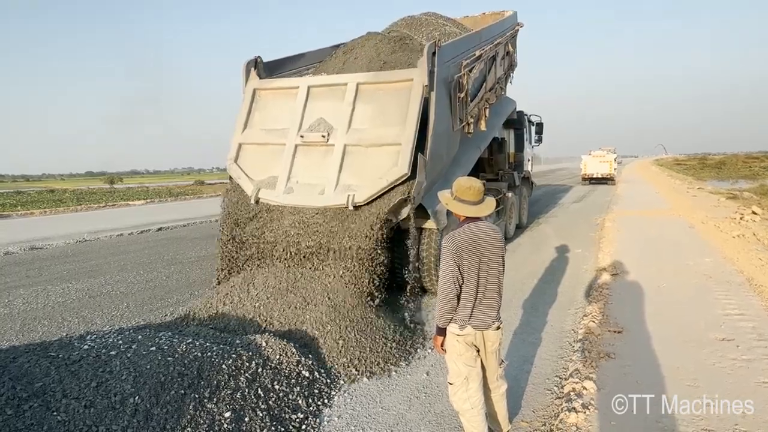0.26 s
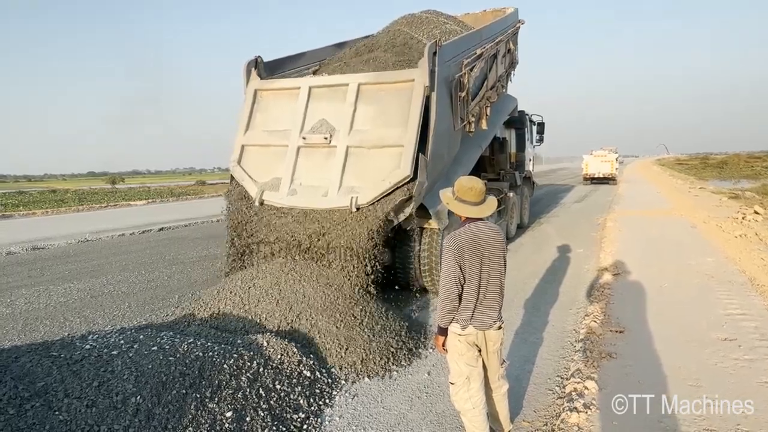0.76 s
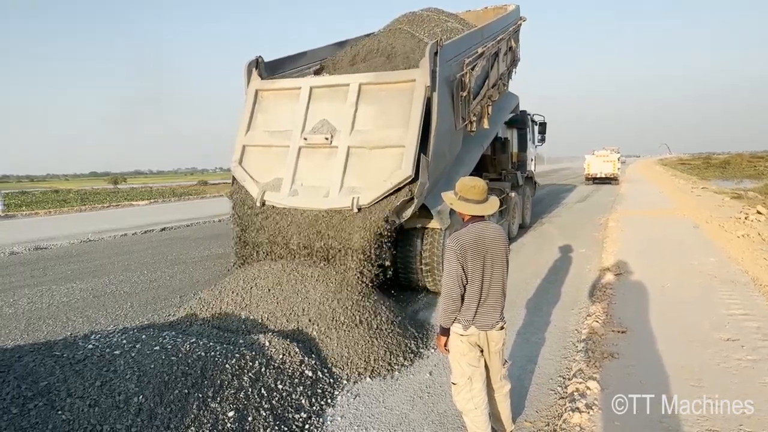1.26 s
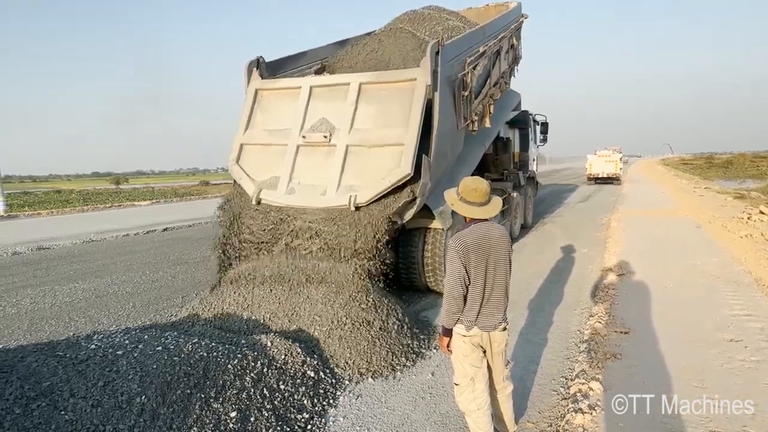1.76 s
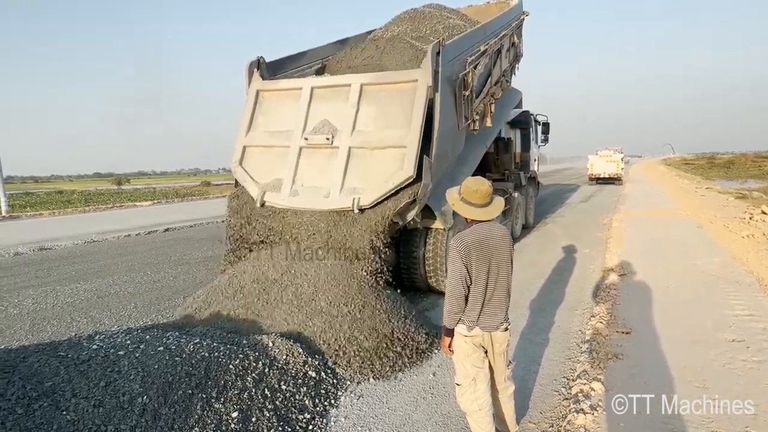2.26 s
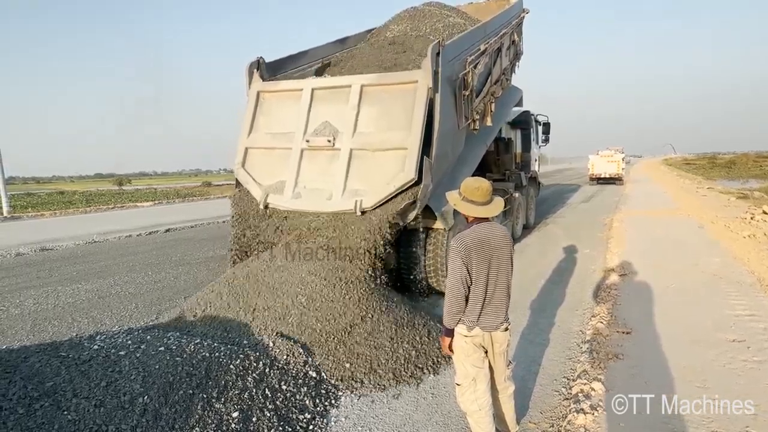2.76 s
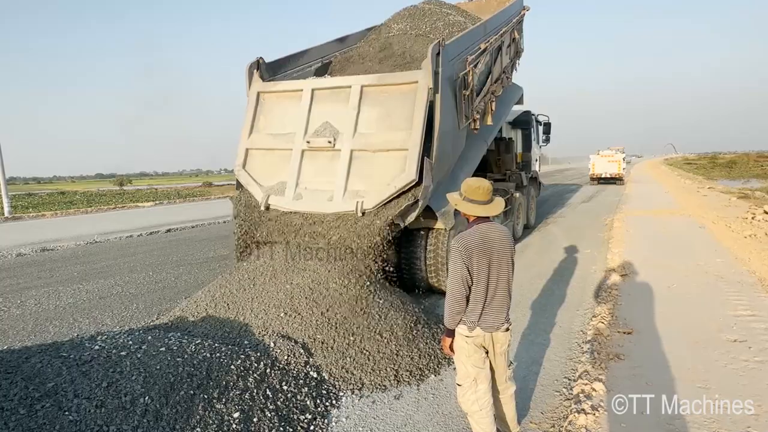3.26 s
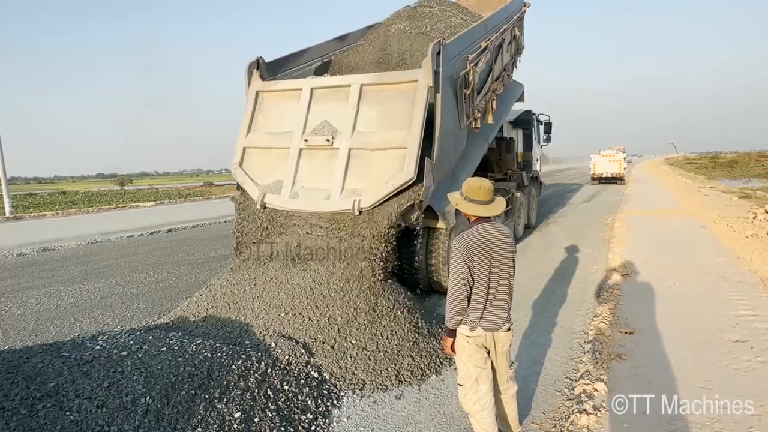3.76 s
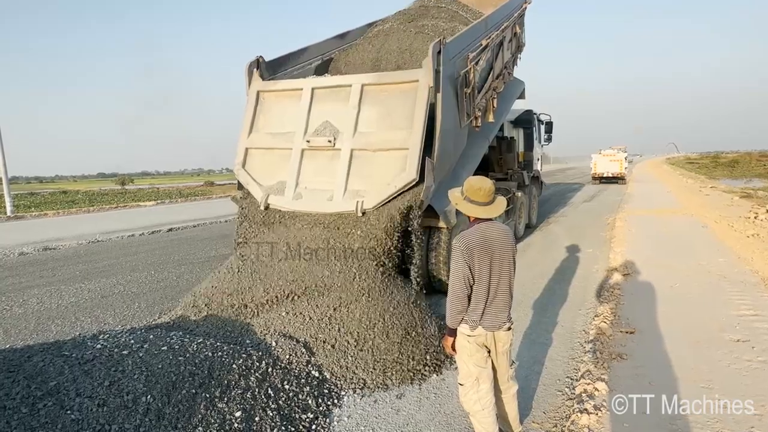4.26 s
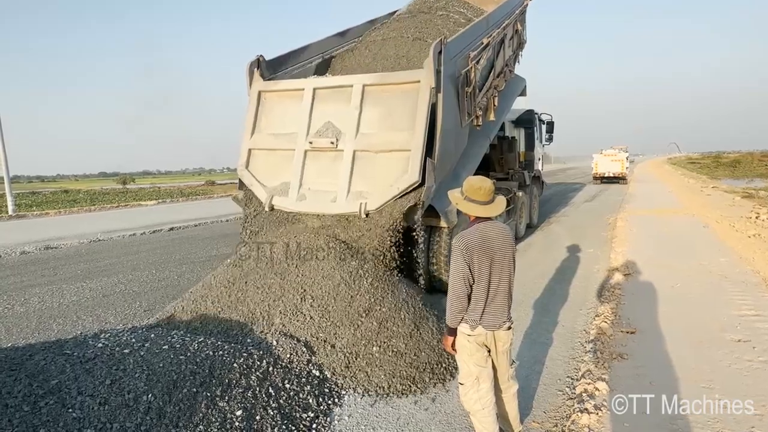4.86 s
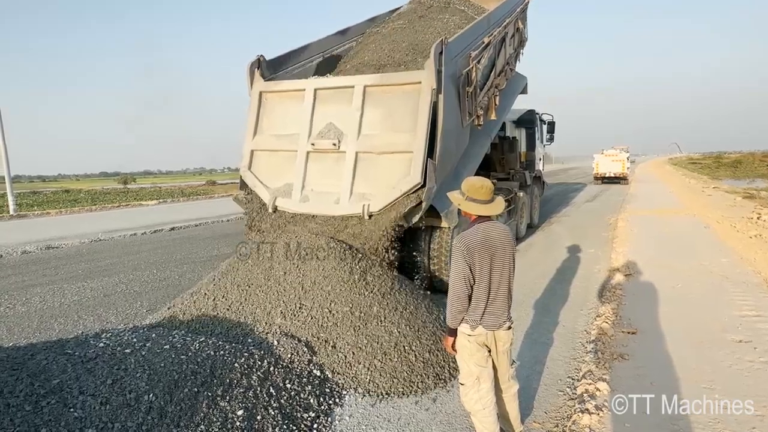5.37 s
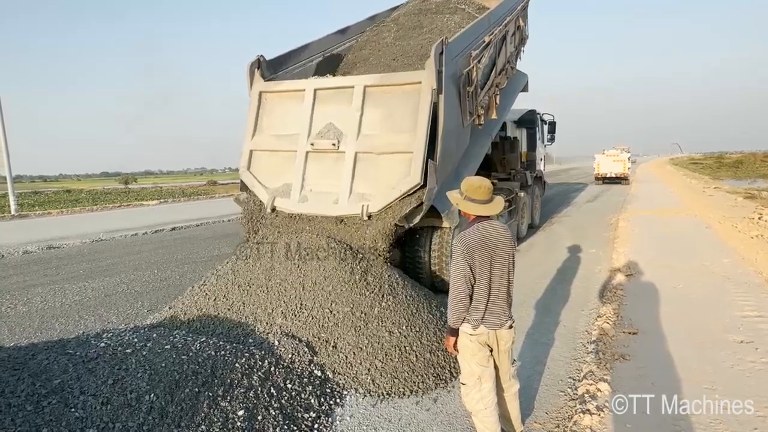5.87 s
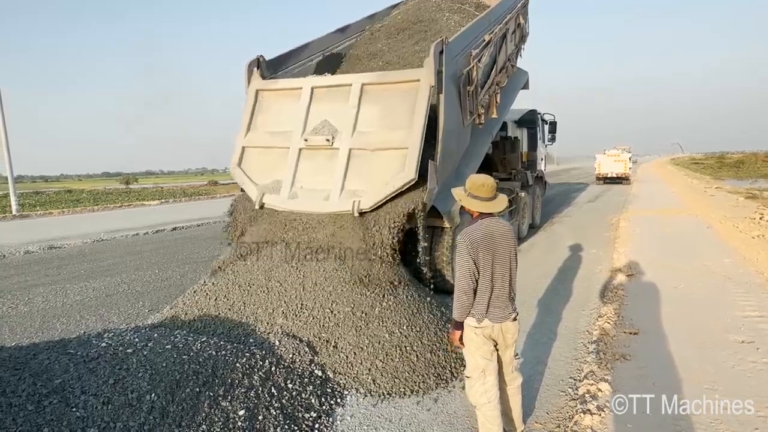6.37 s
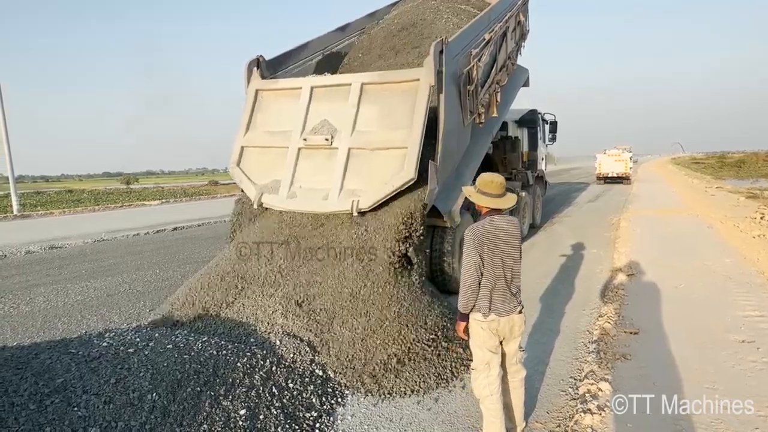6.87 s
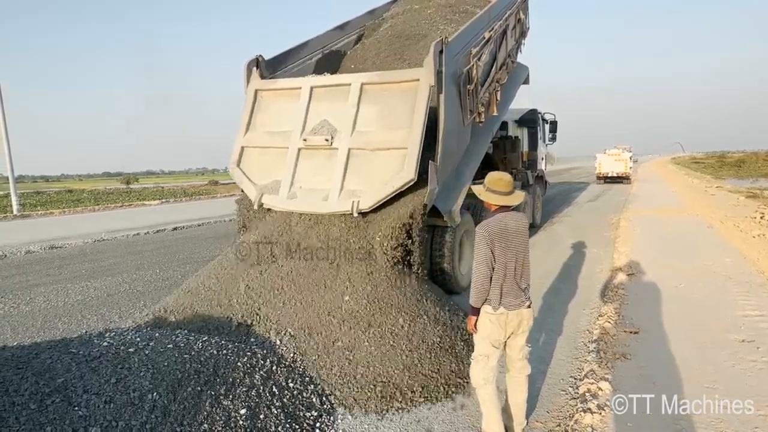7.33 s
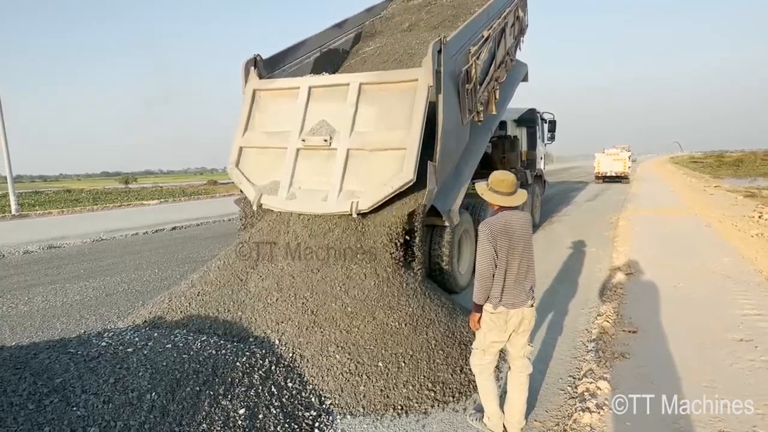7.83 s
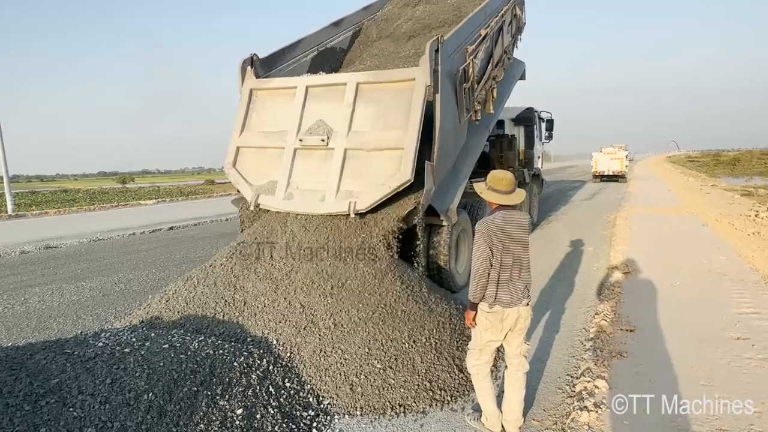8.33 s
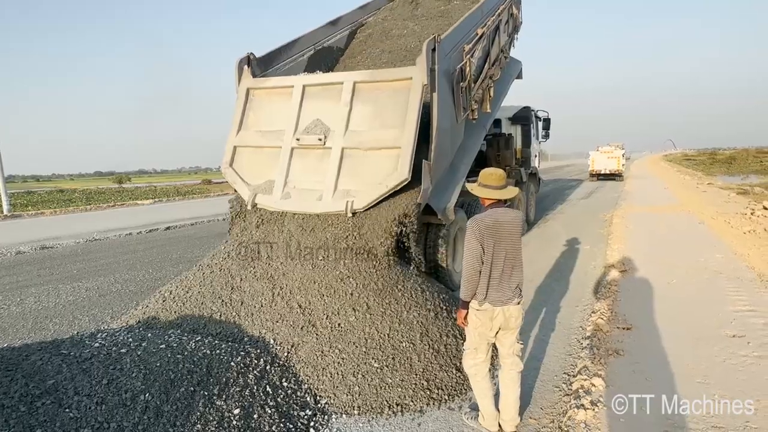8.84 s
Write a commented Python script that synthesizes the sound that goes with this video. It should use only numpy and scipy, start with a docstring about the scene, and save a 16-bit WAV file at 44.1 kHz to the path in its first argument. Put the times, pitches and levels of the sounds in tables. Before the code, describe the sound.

Outdoors at a roadworks site, a compact stereo microphone sits close behind a tipping diesel truck. From the start a low, loaded engine drone and broad roar run steadily, wavering slightly in pitch, with a tonal pump whine above. Fine gravel hisses brightly, strongest at the opening. Around 1.2-1.4 s a dense burst of coarse stones clatters through ringing steel; from about 0.3 to 2.8 s a more distant engine climbs in pitch and fades. Further surges come near 3.2, 4.1 and 4.6 s, then a busy run of clacks from 5.5 to 6.4 s. The hiss thins near 6 s and swells again around 6.8 s with few knocks. At about 7.8 s the engine quickly drops, wobbles briefly and settles into a slower, softer idle by 8.7 s; the pump whine sinks and vanishes near 8.1 s. A last scatter of stones rattles from 8.6 s to the end, around 9 s.

```python
"""Tipping site: a six-cylinder diesel tipper holds its bed up with a whining pump while gravel slides out.
Exhaust lines, pump and whine are sines tied to the crankshaft; the engine roar is coloured noise.
Fine stones hiss, coarse ones slump in surges through the ringing steel, single stones clack at two pitches.
Near the end the engine drops to idle; early on, a second machine farther off speeds up and fades.
Two microphone ports on a small camera hear it all as a sum and a difference."""
import sys
import numpy as np
from scipy import signal
from scipy.fft import rfft, irfft
from scipy.io import wavfile
from scipy.ndimage import uniform_filter1d

SR = 44100
rng = np.random.default_rng(int(sys.argv[2]) if len(sys.argv) > 2 else 0)


def inscribe(sig):
    """Save sig as 16-bit PCM at rate SR to the path in sys.argv[1].

    A 1-D sig is mono; a 2-D sig holds one channel per row.
    Samples are clipped to [-1, 1] before scaling.
    """
    pcm = np.round(np.clip(np.atleast_2d(sig).T, -1, 1) * 32767)
    wavfile.write(sys.argv[1], SR, pcm.astype(np.int16))


N = 401310
T, HZ = np.arange(N) / SR, np.fft.rfftfreq(N, 1 / SR)

# truck engine, hunting slowly under load, then dropping to idle: t/s, firing rate f/Hz, relative effort/dB
ENGINE = [(0, 41.8, 5.5), (.3, 41.7, 2.5), (.7, 42.43, 2), (1, 43.27, 1), (1.4, 43.85, 0.5),
          (2, 44.05, -0.5), (3.5, 44.22, 0.5), (3.8, 42, 1.5), (4.2, 41.7, 2), (4.6, 42.2, 1),
          (5.05, 43.55, -.5), (5.4, 43.82, -0.5), (5.95, 43.9, -1), (6.3, 42.77, 0), (7, 42.66, 0),
          (7.75, 42.28, 1), (7.81, 39.3, -2), (7.87, 36.46, -5), (7.96, 33.63, -8), (8.06, 29.54, -0.5),
          (8.2, 31.04, 1.5), (8.33, 33.56, -7), (8.45, 29.47, -2.5), (8.62, 26.92, -15), (8.67, 26.9, -4.5),
          (8.8, 26.78, -2), (9.1, 27.2, -3)]
# firing multiples 1 to 4: relative strength/dB, waver/dB
FIRING = [(-1.4, 0), (0.67, 1), (-8.5, -4), (-8, 3)]
# exhaust pipe, colouring the firing multiples as they move: f/Hz, level/dB
PIPE = [(27, -64), (31, -56), (38, -53), (41.5, -31.5), (44.3, -23), (54, -29.5), (63, -25), (75, -25),
        (85, -25.5), (98, -22.5), (108, -20.5), (120, -33.5), (130, -24.5), (165, -42), (177, -30)]
# weak lines between, from unequal cylinders: multiple of the crankshaft turn, relative level/dB
UNEVEN = [(4, -36), (4.5, -42), (5, -34), (5.5, -53), (6.5, -38.5), (7, -48), (7.5, -32.5), (8, -32.5),
          (10, -48), (13, -44), (13.5, -47), (15, -47), (16, -44.5), (19, -46), (21, -50.5), (24, -46),
          (27, -50), (30, -65)]
# gear pump: t/s, level/dB of its multiples 1, 2 and 3
PUMP = [(0, -38, -43, -60), (.3, -36, -28.5, -51), (.7, -30, -39, -56), (1.3, -23.5, -38, -52),
        (1.9, -21, -36.5, -63), (2.3, -21.5, -41.5, -56), (2.9, -20.5, -38, -48), (3.4, -19, -33.5, -45),
        (3.6, -25.5, -43, -57), (3.9, -25.5, -32.5, -58), (4.5, -22.5, -34.5, -53),
        (4.9, -26.5, -38.5, -42), (5.05, -28.5, -62, -54), (5.45, -20, -66, -65), (6, -20.5, -37, -51),
        (6.12, -26, -50, -54), (6.4, -20.5, -58, -43), (7.1, -26, -75, -47), (7.68, -24, -46, -43),
        (7.76, -28, -35, -45), (7.83, -24.5, -49, -54), (7.92, -41, -37, -31), (7.99, -50, -39, -49),
        (8.1, -56, -52, -60)]
# faint upper lines that come and go: t/s, level/dB of pump multiple 4, of multiple 5, of a gear whine
UPPER_LINES = [(.3, -64, -62, -60), (.7, -38.5, -62, -62), (1.15, -46, -56, -46), (1.5, -64, -51, -42),
               (2.2, -58, -44, -45.5), (3.2, -62, -46, -54), (3.6, -54, -56, -59), (4.5, -57, -62, -60),
               (5, -40, -62, -44.5), (5.4, -60, -62, -48), (6.7, -62, -62, -48), (7.2, -62, -62, -66)]
# engine body roar: f/Hz, relative level per Hz/dB
ROAR_COLOUR = [(30, -44), (45, -10.5), (100, -1.5), (180, -7.5), (260, -12), (350, -9), (400, -14),
               (520, -23.5), (640, -13), (800, -13.5), (980, -16.5), (1070, -26.5), (1350, -20),
               (1620, -30.5), (2200, -38.5), (3000, -43)]
# fine gravel sliding in fresh flows: t/s, level/dB
SLIDE = [(0.0, -28), (0.56, -32.5), (1.72, -34.5), (1.82, -32), (3.4, -38.5), (4.2, -35), (5.96, -46),
         (6.59, -36), (6.79, -31.5), (8.46, -44.5), (9.1, -39)]
# colour of the fine gravel: f/Hz, relative level per Hz/dB
SLIDE_COLOUR = [(600, 1), (1500, -4), (2200, -6.5), (3200, -7), (4500, -4.5), (6300, 0.5), (8500, 3),
                (11000, -9), (13500, -1), (15800, -1.5)]
# colour of the coarse stones: f/Hz, relative level per Hz/dB
SLUMP_COLOUR = [(320, -60), (550, -5.5), (652, 1.5), (1060, -8.5), (1370, 3.5), (1700, -19), (2020, -3),
                (2870, -11.5), (3270, -8.5), (4540, -15.5), (5860, -17.5), (10000, -26), (13000, -66),
                (22000, -120)]
# surges of coarse stones: start t/s, relative peak level/dB, rise/s, fall/(dB/s)
SURGES = [(1.16, -27, 0.023, 5.8), (1.21, -21.5, 0.017, 93), (1.32, -23.5, 0.016, 85),
          (1.4, -34, .025, 180), (1.95, -34, 0.029, 210), (3.16, -26, 0.043, 20), (4.02, -27, 0.027, 210),
          (4.1, -26.5, 0.025, 490), (4.17, -33, 0.038, 9), (4.555, -31, 0.02, 40), (5.47, -32, 0.054, 125),
          (5.63, -30, 0.038, 1.7), (5.83, -30, 0.019, 3.2), (7.7, -37, 0.021, 340),
          (8.56, -34.5, 0.097, 32.4), (8.73, -30.5, 0.028, 5.6), (8.88, -32.5, 0.12, 10.2)]
# modes of the steel tailgate and bed that the stones strike: f/Hz, width/Hz, relative level/dB
STEEL = [(780, 200, 2), (1390, 270, 1.5), (1875, 190, -7.5), (2346, 165, -2.5), (2604, 126, -5.5),
         (3275, 140, -3.5), (4080, 650, -12), (5700, 300, -7), (6150, 270, -7.5), (7080, 360, -7.5),
         (7810, 150, -5)]
# single stones: t/s, relative strength/dB, first ring f/Hz, second ring f/Hz, second against first/dB
CLACKS = [(0.031, -30, 1340, 5480, -9), (1.171, -31, 2420, 1460, -5), (1.184, -28, 2590, 4100, -3),
          (1.199, -30, 1910, 2400, -2), (1.22, -25.5, 1960, 5940, -6), (1.234, -29, 2440, 3630, -7),
          (1.254, -31, 3900, 1292, 5), (1.331, -26.5, 3330, 1950, 1.5), (1.385, -27, 1442, 5770, -7),
          (1.414, -26, 2070, 3140, -4), (1.681, -34, 2660, 2020, 1), (1.972, -31, 3603, 4600, -2),
          (2.5, -32, 2100, 5680, -5), (3.192, -31, 2497, 4290, -9), (3.239, -30.5, 2080, 1296, -3),
          (3.272, -25.5, 2070, 4050, -7), (3.937, -34, 2150, 2730, -1), (4.041, -30, 1310, 2340, -4),
          (4.058, -34, 3370, 2650, -4), (4.108, -35, 3620, 1390, 3), (4.119, -33.5, 1327, 1780, -1),
          (4.341, -34, 3350, 5810, -7), (4.424, -34, 2312, 3300, -4), (4.458, -33.5, 3330, 5270, -5),
          (4.563, -32, 1890, 1260, -3), (4.61, -39, 1990, 2600, -1), (4.65, -41, 3180, 2300, -1),
          (5.038, -32, 2340, 3680, -4), (5.285, -33, 3210, 5546, 4), (5.465, -33.5, 5440, 5940, -1),
          (5.529, -32.5, 2726, 5850, 1), (5.581, -26, 2700, 3360, -6), (5.655, -33, 2660, 2030, -14),
          (5.715, -34, 6850, 6250, 5), (5.75, -30, 1315, 3470, -8), (5.845, -23.5, 2020, 3190, -4),
          (5.868, -32, 2580, 4750, -3), (5.895, -34, 5440, 3523, -7), (5.919, -29, 2330, 6480, -5),
          (6.003, -28, 1320, 2050, -5), (6.023, -30.5, 7000, 2010, 3), (6.103, -30, 1380, 2100, -4),
          (6.153, -31.5, 4550, 6170, 1), (6.279, -38, 4620, 6180, 2), (6.326, -36, 6200, 6830, -3),
          (6.395, -31, 6280, 3180, 2), (7.717, -37, 3019, 1740, -2), (7.73, -37, 3090, 2540, 0),
          (7.739, -36, 2390, 1400, 1), (8.135, -34, 6000, 7010, 2), (8.287, -39, 3290, 6130, 3),
          (8.619, -38, 5600, 4660, -2), (8.65, -31, 6170, 4490, -5), (8.689, -36, 4300, 3400, 1),
          (8.734, -33, 2580, 3260, -4), (8.764, -32, 2010, 2670, -2), (8.808, -27.5, 1370, 2566, -11),
          (8.825, -33.5, 4410, 3400, 1), (8.862, -38, 1360, 3240, -11), (8.926, -31.5, 1353, 1935, -7),
          (8.96, -36, 1290, 3400, -5), (8.977, -34, 3340, 1447, 5), (9.024, -35, 1290, 5620, -6),
          (9.045, -30, 1358, 2407, -4), (9.075, -32, 3430, 5660, -1), (9.089, -35, 6040, 3760, -4)]
# second machine, farther off: t/s, firing rate f/Hz, level/dB
FAR_MACHINE = [(.3, 49.5, -46), (.7, 52.9, -32), (1.1, 65.7, -31), (1.5, 79.05, -33), (2.301, 76.87, -33),
               (2.8, 85.84, -33)]
# sum of the two ports: f/Hz, level/dB
PORT_SUM = [(300, -2), (1500, -2), (4500, -0.5), (5500, -1.5), (9000, -6.5), (10200, -0.5), (10600, -23.5),
            (11600, -38), (12000, -3.5), (13000, -1)]
# difference of the ports, which agree near 14.5 kHz: f/Hz, level/dB
PORT_DIFFERENCE = [(60, -16), (300, -16), (750, -11), (1700, -3.5), (2200, -5), (4500, 1), (9000, -7),
                   (11000, 5), (13000, -2), (13700, -7), (14000, -43), (15200, -48), (15500, -17)]
# share of the difference tied to the sum: f/Hz, in step (left louder), a quarter turn (left earlier)
PORT_TIE = [(60, 0.14, 0.086), (300, 0.33, -0.2), (800, 0.56, -0.46), (1700, 0.51, .1), (2200, 0.49, .45),
            (3380, 0.67, 0.26), (4500, 0.058, 0.36), (5470, -0.086, -.3), (6500, .2, .1), (8500, 0.01, -.1),
            (9500, 0, -.5), (10500, -0.053, -.4), (12500, 0, .65)]

FIRINGS_PER_TURN, PUMP_PULSES_PER_TURN, WHINE_PULSES_PER_TURN = 3, 10.917, 80
IDLE_FROM_S = 8.66
# roar level at the working firing rate, and its change per Hz of rate
WORKING_HZ, ROAR_DB, ROAR_DB_PER_HZ, ROAR_SMOOTH_S, ROAR_LAG_S = 41.66, -28, 0.56, 1, 0.064
# the rumble within the roar
RUMBLE_DB, RUMBLE_DB_PER_HZ, RUMBLE_SWELL_DB = -1.55, -0.1, 1.17
# coarse flow before its mix: a trickle that thins as the bed empties; a surge runs out after its time
TRICKLE_DB, THINS_DB_PER_S, SURGE_LASTS_S = -30.5, 0.73, 0.73
# levels against a stone's strength; its rings fall 60 dB in a set number of cycles
CLACK_RISE_S, RING_DB, RING_CYCLES, RATTLE_DB, RATTLE_T60_S = 0.0024, 4.5, 150, 6.5, 0.056
# the crack has this level for a stone at CRACK_PITCH_HZ
CRACK_DB, CRACK_T60_S, CRACK_PITCH_HZ = 8, 0.035, 3000
LOW_CUT_HZ, EDGE_HZ = 36.6, 15850


def engine_lines(firing_hz, effort_db, turns):
    """Exhaust pulses: firing multiples coloured by the pipe, and weaker lines from unequal cylinders."""
    out, levels_db = 0, []
    for multiple, (strength_db, _) in enumerate(FIRING, 1):
        pipe_db = np.interp(multiple * firing_hz, *np.transpose(PIPE))
        levels_db.append(effort_db + strength_db + pipe_db)
    for multiple, (db, (_, waver_db)) in enumerate(zip(levels_db, FIRING), 1):
        out = out + tone(FIRINGS_PER_TURN * multiple * turns, db, waver_db)
    # the weak lines follow the second firing multiple, averaged over half a second
    load_db = uniform_filter1d(levels_db[1], SR // 2) + 21.0
    return out + sum(tone(k * turns, db + load_db, waver_db=0.5) for k, db in UNEVEN)


def pump_lines(turns):
    """Gear pump and whine: tooth pulses geared to the crankshaft, fading out as the pump table ends."""
    pumping = np.clip((PUMP[-1][0] - T) / 0.11, 0, 1)
    out = sum(tone(PUMP_PULSES_PER_TURN * k * turns, db, waver_db=0.4 * k)
              for k, db in enumerate(curves(PUMP), 1))
    pulses = (4 * PUMP_PULSES_PER_TURN, 5 * PUMP_PULSES_PER_TURN, WHINE_PULSES_PER_TURN)
    out += sum(tone(k * turns, db, waver_db=4.5) for k, db in zip(pulses, curves(UPPER_LINES)))
    return pumping * out


def idle_notes(turns):
    """Two faint crankshaft multiples that come up once the engine settles at idle."""
    settled = np.clip((T - IDLE_FROM_S) / 0.11, 0, 1)
    return settled * (tone(5 * turns, -49, waver_db=0.0) + tone(7 * turns, -43, waver_db=0.0))


def roar():
    """Noise ringing in engine bay and steel bed follows engine speed; its deep rumble also swells by itself."""
    smooth_hz = uniform_filter1d(curves(ENGINE)[0], round(ROAR_SMOOTH_S * SR))
    faster_hz = np.interp(T - ROAR_LAG_S, T, smooth_hz) - WORKING_HZ
    noise = coloured(rng.standard_normal((2, N)), ROAR_COLOUR)
    rumble = irfft(rfft(noise) / (1 + (HZ / 450) ** 8), N)
    rumble_db = RUMBLE_DB + RUMBLE_DB_PER_HZ * faster_hz + RUMBLE_SWELL_DB * drift(0.16)
    level_db = ROAR_DB + ROAR_DB_PER_HZ * faster_hz + 0.42 * drift(0.019)
    return gain_of(level_db) * (noise - rumble + gain_of(rumble_db) * rumble)


def slide():
    """Small stones, well over a thousand knocks a second, merge into a slightly grainy hiss."""
    hiss = stones(per_s=1700, spread_db=2.0, ring_s=0.0013, bed=0.83)
    return gain_of(curves(SLIDE)[0] + 0.59 * drift(0.024)) * coloured(hiss, SLIDE_COLOUR)


def slump():
    """Larger stones in surges: a dull rattle, and knocks that each ring one mode of the steel."""
    rattle = coloured(stones(per_s=400, spread_db=2.5, ring_s=0.003, bed=0.85), SLUMP_COLOUR)
    pings = 0
    for hz, width, db in STEEL:
        knocks = stones(per_s=90, spread_db=3.5, ring_s=0.0092, bed=0.16)
        pings = pings + gain_of(db) * ring(knocks, hz, width)
    return tumbling() * gain_of(0.16 * drift(0.031)) * (0.45 * rattle + 0.5 * evened(pings))


def tumbling():
    """Strength of the coarse flow: the trickle plus each surge, which swells quickly and dies away."""
    power = gain_of(TRICKLE_DB - THINS_DB_PER_S * T) ** 2
    for start, db, rise, fall in SURGES:
        t = T - start
        shape = np.clip(np.minimum(t / rise, (SURGE_LASTS_S - t) / 0.063), 0, 1)
        power = power + (shape * gain_of(db - fall * np.clip(t - rise, 0, 1))) ** 2
    return np.sqrt(power)


def clacks():
    """Each stone rings at its own two pitches, rattles the steel briefly, and cracks harder if bright."""
    out, t = np.zeros((2, N + 3000)), np.arange(3000) / SR
    crack_filter = signal.butter(2, [1800, 8000], "bandpass", fs=SR)
    rise = 1 - np.exp(-t / CLACK_RISE_S)
    for s, db, main_hz, second_hz, second_db in CLACKS:
        own = 0
        for hz, ring_db in ((main_hz, 0), (second_hz, second_db)):
            decay = gain_of(RING_DB + ring_db - 60 * t * hz / RING_CYCLES)
            own = own + decay * np.sin(2 * np.pi * (hz * t + rng.random((2, 1))))
        noise = rng.standard_normal((2, len(t))) * rise
        puff = noise * gain_of(RATTLE_DB - 60 * t / RATTLE_T60_S)
        steel = sum(gain_of(mode_db) * ring(puff, hz, width) for hz, width, mode_db in STEEL)
        crack = signal.lfilter(*crack_filter, noise * gain_of(CRACK_DB - 60 * t / CRACK_T60_S))
        crack = crack * main_hz / CRACK_PITCH_HZ
        start = round(s * SR)
        out[:, start:start + len(t)] += gain_of(db) * (own * rise + steel + crack)
    return out[:, :N]


def far_machine():
    """A second engine farther off: one firing line, gliding mostly upward, faded in and out."""
    hz, db = curves(FAR_MACHINE)
    first_s, last_s = FAR_MACHINE[0][0], FAR_MACHINE[-1][0]
    heard = np.clip(np.minimum(T - first_s + 0.26, last_s - T) / 0.073, 0, 1)
    return heard * tone(np.cumsum(hz) / SR, db, waver_db=1.5)


def machines():
    """All steady-pitched lines: the truck's share one crankshaft angle, the far machine runs freely."""
    firing_hz, effort_db = curves(ENGINE)
    turns = np.cumsum(firing_hz / FIRINGS_PER_TURN) / SR
    return engine_lines(firing_hz, effort_db, turns) + pump_lines(turns) + idle_notes(turns) + far_machine()


def ports(straight, scattered):
    """Left and right from the sum and difference of the two ports; the difference is partly tied to the sum."""
    in_step, quarter = spectra(PORT_TIE)
    free = np.sqrt(np.clip(1 - in_step ** 2 - quarter ** 2, 0, 1))
    a, b = rfft(straight), rfft(scattered)
    both = irfft(a * gain_of(spectra(PORT_SUM)[0]), N)
    difference = (in_step + 1j * quarter) * a + free * b
    apart = irfft(difference * gain_of(spectra(PORT_DIFFERENCE)[0]), N)
    return np.array([both + apart, both - apart])


def tone(turns, db, waver_db=1.2):
    """A sine, from its running turns, whose level wavers."""
    level = np.sqrt(2) * gain_of(db + waver_db * drift(0.035))
    return level * np.sin(2 * np.pi * (turns + rng.random()))


def stones(per_s, spread_db, ring_s, bed):
    """Knocks of random size, each a dying puff of noise, over an even bed; two noises share the knocks."""
    struck = rng.exponential(1, N)
    size = gain_of(spread_db * np.minimum(struck, 4)) * (rng.random(N) < per_s / SR)
    knocks = signal.lfilter([1], [1, -np.exp(-1 / (ring_s * SR))], size ** 2)  # power
    return np.sqrt(bed + knocks / knocks.mean()) * rng.standard_normal((2, N))


def ring(x, hz, width):
    """One resonance of peak gain 1."""
    return signal.lfilter(*signal.iirpeak(hz, hz / width, fs=SR), x)


def drift(seconds):
    """Slow chance of rms 1: noise drawn every 128 samples and averaged twice over the given time."""
    size = int(seconds * SR / 128) + 1
    slow = rng.standard_normal(N // 128 + 1)
    slow = uniform_filter1d(uniform_filter1d(slow, size), size)
    return np.interp(np.arange(N) / 128, np.arange(len(slow)), evened(slow))


def coloured(x, colour):
    """Filters by a dB spectrum and scales to rms 1."""
    return evened(irfft(rfft(x) * gain_of(spectra(colour)[0]), N))


def curves(rows):
    """Each column of a table over time."""
    s, *columns = np.transpose(rows)
    return [np.interp(T, s, c) for c in columns]


def spectra(rows):
    """Each column of a table over log frequency."""
    f, *columns = np.transpose(rows)
    return [np.interp(np.log(HZ + 1), np.log(f + 1), c) for c in columns]


def evened(x):
    """Scales to rms 1."""
    return x / np.sqrt(np.mean(x ** 2) + 1e-20)


def gain_of(db):
    """Turns dB into a factor."""
    return 10 ** (np.asarray(db) / 20)


def scene():
    """Every source reaches the ports straight and scattered; the lines return late off the heap."""
    straight, scattered = roar() + slide() + slump() + clacks()
    lines = machines()
    late = np.roll(lines, 700)  # about 16 ms
    return ports(straight + lines, scattered + 0.15 * late)


def record(dry):
    """The microphone's steep bass cut, then its upper band limit."""
    bass_cut = signal.butter(10, LOW_CUT_HZ, "highpass", fs=SR, output="sos")
    thinned = signal.sosfilt(bass_cut, dry)
    band_limit = signal.firwin(511, EDGE_HZ, window=("kaiser", 9), fs=SR)
    return signal.oaconvolve(thinned, band_limit[None], "same")


dry = scene()
out = record(dry)
inscribe(out)
```